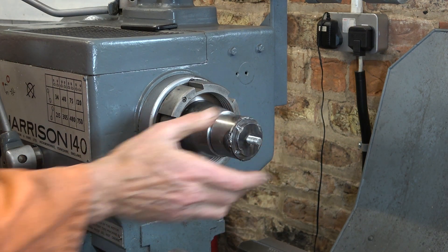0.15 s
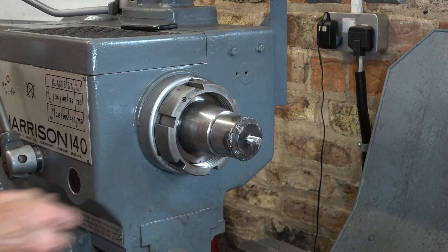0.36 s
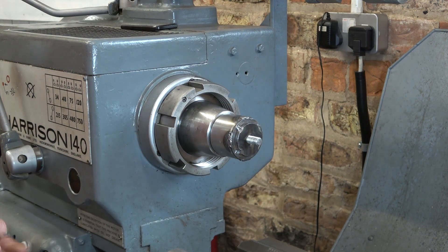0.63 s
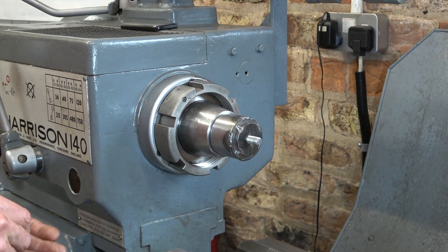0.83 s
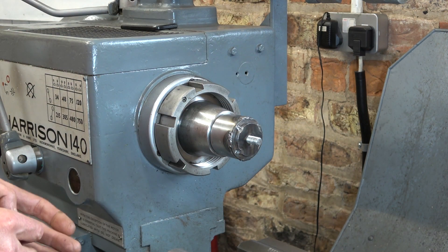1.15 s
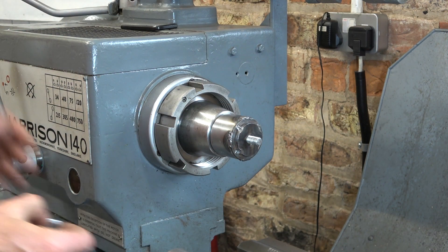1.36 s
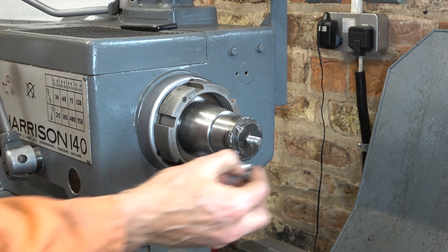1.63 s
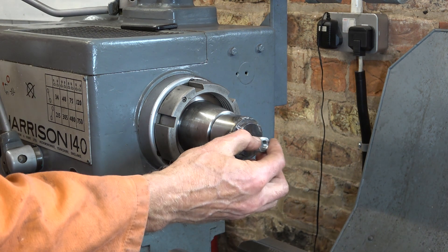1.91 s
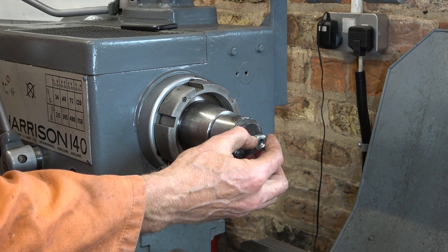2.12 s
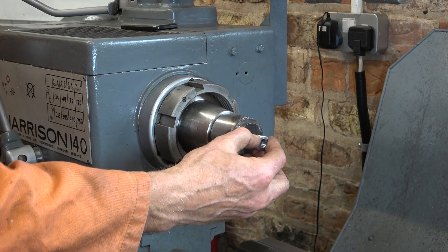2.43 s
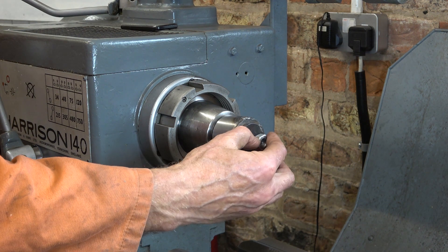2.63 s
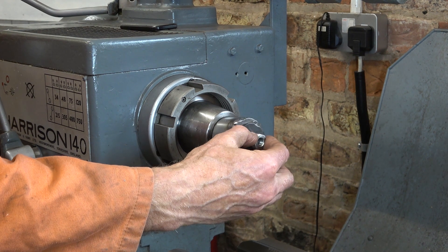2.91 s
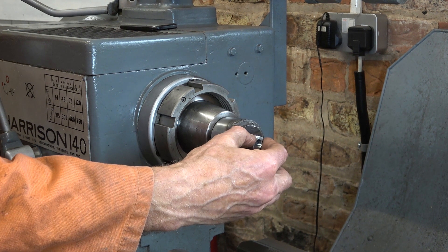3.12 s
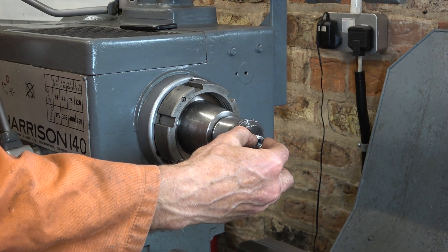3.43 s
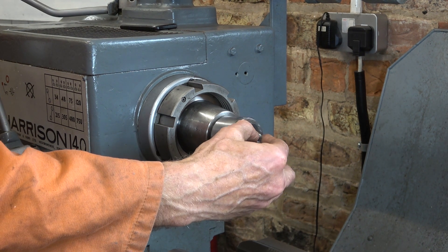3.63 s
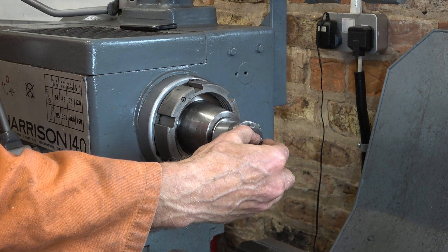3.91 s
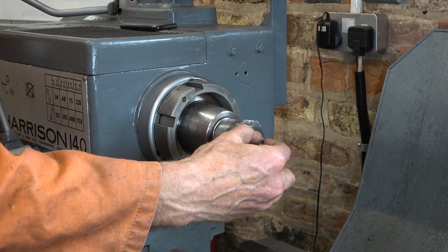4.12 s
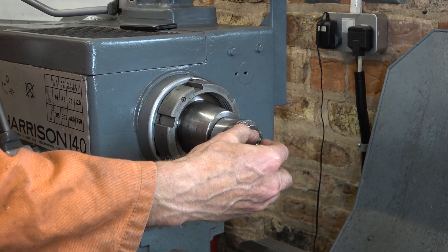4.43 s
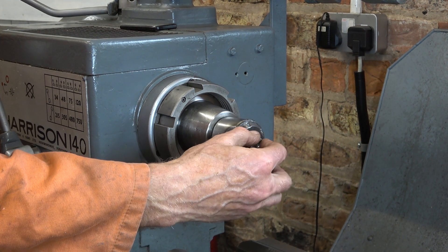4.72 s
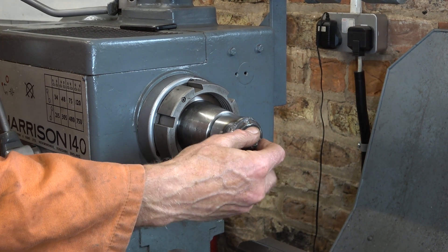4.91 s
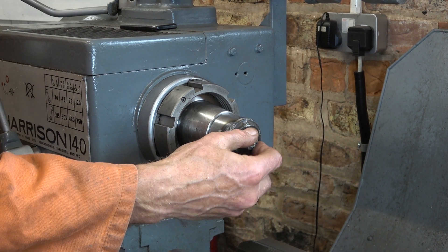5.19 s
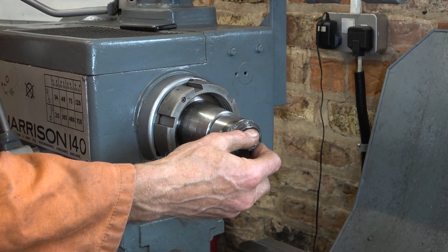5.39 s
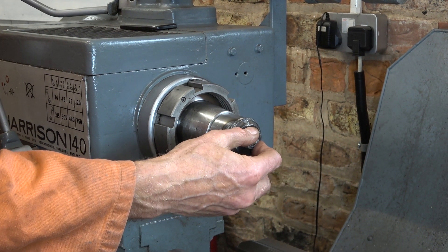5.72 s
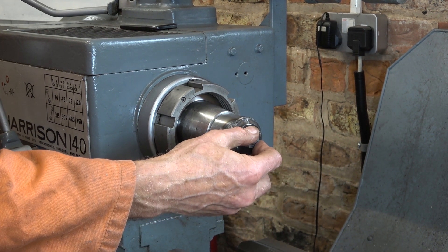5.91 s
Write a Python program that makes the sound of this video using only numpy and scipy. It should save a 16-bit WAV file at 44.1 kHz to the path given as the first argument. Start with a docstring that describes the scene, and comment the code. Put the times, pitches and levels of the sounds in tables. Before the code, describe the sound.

After faint metal ticks and sleeve rustle, metal touches metal, then hand-turned threads clack, rasp and squeak in quick uneven twists, ringing slightly.

```python
"""A threaded steel piece, fitted by hand to a lathe spindle, clacks, scrapes and squeals at each twist.
Clacks are impulse swarms exciting steel resonances; scraping is stick-slip noise, low groan and rasp.
Squeals are wavering sines on two modes; a first touch and the thread entry add ringing modes.
Around it lie ticks of metal in the fingers, dull knocks of the hand, a rustling sleeve and room air.
Decaying noise supplies the ring of machine and room in a small brick workshop."""
import sys
import numpy as np
from scipy import signal
from scipy.fft import rfft, irfft
from scipy.io import wavfile
from scipy.ndimage import map_coordinates

SR = 44100
rng = np.random.default_rng(int(sys.argv[2]) if len(sys.argv) > 2 else 0)


def master_out(mix):
    """Clip the mix to full scale and print it as 16-bit PCM to the path in sys.argv[1]."""
    frames = np.transpose(np.atleast_2d(mix))
    ceiling = np.clip(frames, -1, 1)
    pcm = np.round(ceiling * 32767).astype(np.int16)
    wavfile.write(sys.argv[1], SR, pcm)


N = 266937
T = np.arange(N) / SR
FREQ = np.maximum(np.arange(N + 1) * SR / (2 * N), 1)

# resonances and dips of the steel piece and spindle: centre_hz, width_hz, lift_db
STEEL_MODES = [(92, 27, 11.5), (297, 35, 8.5), (644.5, 8, 4), (748.5, 57, 6), (798, 37.6, 7), (853, 56, -9),
               (1203, 110, 4), (1506, 29, 3.5), (1529, 39, 6), (2032, 144, 5), (2434, 240, 3.5),
               (2945, 61, 5), (3100, 120, 5), (3587, 120, 8.5), (4160, 13, -2), (4345, 36, -13),
               (4960, 39, 6.5), (6000, 20, -6.5), (6240, 54, 11), (6750, 32, 12.5), (10630, 98, 5.5),
               (12260, 250, 5.5)]
# knocks of the piece on the spindle without turning: start_s, force_db, tick_db (relative levels)
KNOCK_EVENTS = [(1.962, -54.5, -42), (2.392, -57, -68), (2.596, -41, -44.5), (4.252, -36, -48),
                (5.472, -43, -35.5), (5.703, -30.5, -60)]
# twists of the hand, clack then rasp; weight is how hard the hand leans on the spindle:
# clack_s, length_s, force_db, weight_db, tick_db (relative levels)
TWIST_EVENTS = [(3.411, 0.063, -24.5, 0.5, -35.5), (3.684, 0.051, -25.5, 2, -37.5),
                (3.817, 0.073, -37.5, -0.5, -60), (4.270, 0.066, -20.5, -5.5, -28),
                (4.536, 0.071, -32.5, 4.5, -44), (4.696, 0.052, -32, 8.5, -35.5),
                (4.779, 0.046, -40, 10, -40), (4.945, 0.089, -34, 4, -57), (5.058, 0.077, -31.5, 2.5, -50),
                (5.237, .056, -24, 2.5, -29.5), (5.312, 0.071, -26.5, 1.5, -29.5),
                (5.492, .058, -25.5, 1, -33.5), (5.726, 0.055, -21, 0.5, -27),
                (5.787, 0.031, -21.5, -0.5, -31.5), (5.944, .09, -33.5, 1, -33)]
SQUEAL_HIGH_HZ, SQUEAL_LOW_HZ = 6342, 5074  # the two modes that friction can keep singing


def undb(db):
    """Logarithmic level: decibels become an amplitude gain."""
    return 10 ** (np.asarray(db) / 20)


def unit(x):
    """Power normalisation: scale to rms 1."""
    return x / np.sqrt(np.mean(x ** 2))


def at_hz(points, hz=FREQ):
    """Logarithmic interpolation: read a table linearly along log frequency."""
    f, value = np.transpose(points)
    return np.interp(np.log(hz), np.log(f), value)


def colour(x, points, modes=()):
    """Minimum-phase filtering: a causal filter of unit power, a smooth spectrum bearing resonances."""
    db = at_hz(points)
    for hz, width, lift in modes:
        db = db + lift / (1 + (2 * (FREQ - hz) / width) ** 2)
    # folding the cepstrum onto positive times makes the response causal
    cepstrum = irfft(np.log(unit(undb(db))))
    cepstrum[1:N] *= 2
    cepstrum[N + 1:] = 0
    response = irfft(np.exp(rfft(cepstrum)))[:SR // 4]
    return signal.fftconvolve(x, response)[:N]


def walk(rate):
    """Random modulation: smooth wandering through rate random points a second, spread near 1."""
    steps = rng.standard_normal(4096)
    return map_coordinates(steps, [T * rate], order=3, mode="wrap")


def tail(build_s):
    """Reverberation: dense noise of unit energy builds up briefly and decays at a rate set by pitch."""
    # ring time of machine and room: frequency_hz, t60_s
    decay_times = [(100, 1), (700, 0.8), (3000, 0.83), (6500, 0.81), (10000, 0.31), (16000, 0.68)]
    t = T[:SR]
    noise = rfft(rng.standard_normal(SR))
    hz = np.maximum(np.arange(SR // 2 + 1), 1)
    centres = np.log(np.geomspace(100, 16000, 9))
    out = 0
    for centre, pick in zip(centres, np.eye(len(centres))):
        band = irfft(noise * np.interp(np.log(hz), centres, pick), SR)
        t60 = at_hz(decay_times, np.exp(centre))
        out = out + band * np.exp(-np.log(1000) * t / t60)
    out = out * (1 - np.exp(-t / build_s))
    return out / np.linalg.norm(out)


def resonate(x, hz, q):
    """Resonance: a single peak with gain 1 at its centre."""
    return signal.lfilter(*signal.iirpeak(hz, q, fs=SR), x + 1e-18)


def add(track, s, sound):
    """Superposition: mix a sound in at time s."""
    i = int(s * SR)
    track[i:i + len(sound)] += sound[:N - i]


def held(s, length, rise_s, fall_s):
    """Exponential envelope: swells from time s, holds for a length and then dies away."""
    age = np.maximum(T - s, 0)
    return (1 - np.exp(-age / rise_s)) * np.exp(-np.maximum(age - length, 0) / fall_s)


def slips(rate, scatter_db):
    """Stick-slip: tiny releases at random moments, rate a second on average and of uneven size."""
    size = undb(scatter_db * np.clip(rng.standard_normal(N), -2, 2))
    size = size * rng.choice([-1, 1], N)
    return unit((rng.random(N) < rate / SR) * size)


def arm_motion():
    """Power addition: Gaussian swells of the reaches add to a steady faint rustle."""
    # reaches of the arm: middle_s, half_length_s, level_db (relative)
    reach_events = [(.28, 0.15, -60.5), (0.683, 0.14, -55), (1.457, .1, -57.5), (1.67, 0.12, -58),
                    (2.148, 0.12, -59.5)]
    rest_gain = undb(-67.5)  # the arm is never quite still
    reaches = [undb(db) * np.exp(-.5 * ((T - s) / half) ** 2) for s, half, db in reach_events]
    return np.sqrt(rest_gain ** 2 + np.sum(np.square(reaches), axis=0))


def workshop(sleeve_db):
    """Shaped noise: steady room air with a faint drone, and random slips of cloth in the sleeve."""
    # spectrum of the room air: frequency_hz, relative_db_per_hz
    air_spectrum = [(15, -28), (25, 3), (190, -5), (301, -12), (489, -11.5), (659, -10.5), (818, -9),
                    (887, -6.5), (1650, -22.5), (2000, -22), (2280, -25), (16000, -33)]
    # spectrum of the sleeve: frequency_hz, relative_db_per_hz
    cloth_spectrum = [(100, -16), (600, 7), (1200, 4.5), (2500, -0.5), (6000, -6.5), (9000, -11),
                      (13000, -17), (16000, -47)]
    drone = (307.4, 61, 13.8)  # centre Hz, width Hz, lift dB
    air = undb(-57) * colour(rng.standard_normal(N), air_spectrum, [drone])
    folds = slips(rate=6000, scatter_db=4) * undb(.8 * walk(30))
    cloth = colour(folds, cloth_spectrum) * arm_motion() * undb(sleeve_db)
    return air + cloth


def thumps(length_s):
    """Damped oscillation: soft knocks of a few low cycles that swell, peak at length_s and die."""
    # dull knocks of the hand on the machine: start_s, level_db, pitch_hz
    thump_events = [(.76, -47.5, 343), (.765, -49, 217), (5.972, -38, 155)]
    out, t = np.zeros(N), T[:SR // 2]
    swell = t / length_s * np.exp(1 - t / length_s)
    for s, db, hz in thump_events:
        add(out, s, undb(db) * swell * np.sin(2 * np.pi * hz * t))
    return out


def clink(db, ring_s, first_db, entry_db):
    """Free vibration: the loose piece rings at its first touch, and again as it enters the thread."""
    # spectrum of the diffuse ring at the first touch: frequency_hz, relative_db_per_hz
    clink_spectrum = [(3000, -21), (5100, 2), (7700, -1), (9200, -25), (10650, -5), (11300, -14),
                      (11950, -1), (13500, -31)]
    # modes of the piece while still loose: frequency_hz, relative_db, t60_s
    loose_modes = [(2105, -8, 1.0), (2970, -15, 1.4), (3490, -2.5, 1.2), (5070, -1.5, 0.53),
                   (5800, -6, 0.5), (6347, -2, .3), (7000, 1, .25), (10590, -7.5, 0.51), (11850, -6, .4)]
    out, t = np.zeros(N), T[:SR]
    first_s, entry_s = KNOCK_EVENTS[0][0], KNOCK_EVENTS[2][0]
    add(out, first_s, tail(build_s=.004) * np.exp(-t / ring_s))
    out = undb(db) * colour(out, clink_spectrum)
    modes = np.zeros(len(t))
    for hz, mode_db, t60 in loose_modes:
        modes += undb(mode_db - 60 * t / t60) * np.sin(2 * np.pi * hz * t)
    add(out, first_s, undb(first_db) * modes)
    add(out, entry_s, undb(entry_db) * modes)
    return out


def squeals(db, waver_hz, ring_s, room_db):
    """Friction-driven modes: nearly pure, wavering tones ring on when the friction lets go."""
    # squeals of the threads: start_s, length_s, level_db (relative), mode_hz (before wavering)
    squeal_events = [(2.693, 0.2, -56, SQUEAL_HIGH_HZ), (3.112, 0.11, -59, SQUEAL_LOW_HZ),
                     (3.41, 0.073, -19, SQUEAL_HIGH_HZ), (3.504, 0.021, -21, SQUEAL_HIGH_HZ),
                     (3.517, 0.049, -36.5, SQUEAL_LOW_HZ), (3.608, 0.094, -39.5, SQUEAL_HIGH_HZ),
                     (4.298, 0.13, -32.5, SQUEAL_HIGH_HZ), (4.343, 0.074, -26, SQUEAL_LOW_HZ),
                     (4.725, 0.11, -34.5, SQUEAL_HIGH_HZ), (5.005, 0.011, -46, SQUEAL_HIGH_HZ),
                     (5.392, 0.044, -35, SQUEAL_LOW_HZ)]
    drift = 2 * np.pi * np.cumsum(waver_hz * walk(70)) / SR
    tone = np.zeros(N)
    for s, length, level_db, hz in squeal_events:
        envelope = held(s, length, rise_s=0.0015, fall_s=ring_s)
        tone += undb(level_db) * envelope * np.sin(2 * np.pi * hz * T + drift)
    tone *= np.sqrt(2) * undb(db + 2 * walk(50))
    return tone + undb(room_db) * signal.fftconvolve(tone, tail(build_s=0.0035))[:N]


def strokes():
    """Frictional loading: force sets the grit; weight and engaged thread lower the groan's pitch."""
    # slides between twists, without a clack: start_s, length_s, force_db, weight_db (relative levels)
    slide_events = [(2.65, 0.078, -43.5, 6), (2.726, 0.044, -54, 19), (2.882, 0.2, -49, 5.5),
                    (3.076, 0.039, -46.5, 10.5), (3.285, 0.095, -37.5, -1), (3.548, 0.1, -35, 4),
                    (3.894, 0.083, -38.5, 8), (4.128, 0.12, -43.5, 12), (4.408, 0.066, -29, 6.5),
                    (5.889, 0.051, -28, -3.5)]
    lead_s = 0.0078  # the threads start to rub just before they clack
    twist_swell, slide_swell = 0.12, 0.25  # rise time of the pressure as a share of the stroke
    # the pitch sinks as more turns of thread take hold, and under the weight of the hand
    engage_s, seating_s = 2.57, 0.89
    loose_hz, seated_hz = 1270, 690  # pitch at engagement and its final limit, before the sag
    sag_per_db = .013  # fall in log pitch per dB of weight
    pushes = [(s - lead_s, length, force_db, weight_db, twist_swell)
              for s, length, force_db, weight_db, _ in TWIST_EVENTS]
    pushes += [(*row, slide_swell) for row in slide_events]
    rows = []  # start_s, length_s, rise_s, groan_db, pitch_hz, grit_db
    for s, length, force_db, weight_db, swell in pushes:
        hz = seated_hz + (loose_hz - seated_hz) * np.exp((engage_s - s) / seating_s)
        hz = hz * np.exp(-sag_per_db * weight_db)
        rows.append((s, length, swell * length, force_db + weight_db, hz, force_db))
    return rows


def dry_and_room(dry, room_db):
    """Convolution: the rubbing joins its ring in the machine and room."""
    return dry + undb(room_db) * signal.fftconvolve(dry, tail(build_s=0.013))[:N]


def rubbing(groan_db, grit_db, room_db, grip_db, grip_q, firmness, flank_db, flank_q):
    """Stick-slip friction: coarse slips make the spindle groan; fine ones rasp on the thread flanks."""
    # spectrum of the groan: frequency_hz, relative_db_per_hz
    groan_spectrum = [(25, -27), (85, -11), (160, -9), (320, 0), (750, -1.5), (950, -3), (1300, -2.5),
                      (2000, -18), (5000, -16), (16000, -61)]
    # spectrum of the rasp: frequency_hz, relative_db_per_hz
    grit_spectrum = [(200, -25), (900, -16), (1700, 6), (3300, -3), (4600, -7.5), (6800, -7.5), (8200, -13),
                     (11000, -36), (16000, -57)]
    firm_groan_db = -20  # groan of a firm twist, before the overall groan level
    flank_low_hz, flank_high_hz = 1305, 5930  # resonances that shift with the point of contact
    coarse = slips(rate=600, scatter_db=3) * undb(1.8 * walk(40))
    fine = slips(rate=1800, scatter_db=4) * undb(1.8 * walk(45))
    groan, grit = np.zeros(N), np.zeros(N)
    for s, length, rise_s, low_db, hz, high_db in strokes():
        pressure = held(s, length, rise_s, fall_s=0.014)
        push = coarse * pressure * undb(low_db)
        # a light touch sounds mostly the contact; a firm one shakes the whole headstock
        shake = push * undb(firmness * (low_db - firm_groan_db))
        groan += shake + undb(grip_db) * resonate(push, hz, grip_q)
        rasp = fine * pressure * undb(high_db)
        # every stroke bears on another spot of the thread and brings out other resonances
        flanks = flank_low_hz * (flank_high_hz / flank_low_hz) ** rng.random(size=3)
        grit += rasp + undb(flank_db) * sum(resonate(rasp, f, flank_q) for f in flanks)
    groan = undb(groan_db) * colour(groan, groan_spectrum, STEEL_MODES)
    grit = undb(grit_db) * colour(grit, grit_spectrum, STEEL_MODES)
    return dry_and_room(groan + grit, room_db)


def chatter(length, rate, scatter_db):
    """Repeated impact: a first contact and a dense swarm of dying rebounds, of unit energy together."""
    t = T[:SR // 5]
    size = rng.choice([-1, 1], len(t)) * undb(scatter_db * rng.uniform(-1.57, 1, len(t)))
    force = (rng.random(len(t)) < rate / SR) * size
    force[0] = 1
    force *= np.exp(-(t / length) ** 2)
    return force / np.linalg.norm(force)


def contacts(rows, modes, tick_db, ring_db, tick_room_db, direct_db, point_db):
    """Impact excitation: each blow gives a bright pitched tick and rings the steel, machine and room."""
    # spectrum of the tick: frequency_hz, relative_db_per_hz
    tick_spectrum = [(30, -46), (1000, -8.5), (3000, 1.5), (7000, 10), (8500, 5), (11000, 1), (13500, -2.5),
                     (16000, -28.5)]
    # spectrum of the ring: frequency_hz, relative_db_per_hz
    ring_spectrum = [(25, -14), (100, -27.5), (200, 0.5), (350, -7), (700, 4.5), (1000, 1), (2500, 2),
                     (4500, 3), (6800, 1), (8200, -8), (11000, -21.5), (16000, -37.5)]
    tick, ring = np.zeros(N), np.zeros(N)
    for s, sharp_db, body_db, length, hz in rows:
        force = chatter(length, rate=5000, scatter_db=6)
        # the point of contact sets the pitch of the tick
        pitched = force + undb(point_db) * resonate(force, hz, q=13.0)
        add(tick, s, pitched * undb(sharp_db + tick_db) * np.sqrt(length * SR))
        add(ring, s, force * undb(body_db + ring_db))
    tick = colour(tick, tick_spectrum, modes)
    ring = colour(ring, ring_spectrum, modes)
    room = signal.fftconvolve(ring + undb(tick_room_db) * tick, tail(build_s=0.0066))[:N]
    return tick + undb(direct_db) * ring + room


def clacks():
    """Impact scaling: a blow of greater force rings louder and rebounds for longer."""
    firm_db = -22  # force of a firm twist
    firm_chatter_s, growth = 0.021, 0.41  # rebounds of a firm clack; dB of length per dB of force
    clack_hz = 10300  # pitch of the tick where thread meets thread
    blows = list(KNOCK_EVENTS)
    blows += [(s, force_db, tick_db) for s, _, force_db, _, tick_db in TWIST_EVENTS]
    rows = []  # start_s, tick_db, ring_db, chatter_s, pitch_hz
    for s, force_db, tick_db in blows:
        length = firm_chatter_s * undb(growth * (force_db - firm_db))
        rows.append((s, tick_db, force_db, length, clack_hz))
    return rows


def stereo(x, balance_db, wider_db):
    """Mid-side stereo: early reflections enter left and right with opposite sign to give width."""
    # side level against mid, before wider_db: frequency_hz, level_db
    side_width = [(60, -18.5), (600, -18), (2500, -21), (4400, -20), (8000, -6.5), (15000, -17)]
    t = T[:SR // 10]
    early = rng.standard_normal(len(t)) * t * np.exp(-t / .008)
    side = signal.fftconvolve(x, early / np.linalg.norm(early))[:N]
    side = rfft(side, 2 * N) * undb(at_hz(side_width) + wider_db)
    sign = np.array([[1], [-1]])  # left, right
    return irfft(rfft(x, 2 * N) * undb(sign * balance_db / 2) + sign * side)[:, :N]


def scene():
    """Superposition of sources: sounds at the spindle, with touches and the diffuse workshop around."""
    # light touches of metal in the fingers: start_s, tick_db (relative), pitch_hz
    tick_events = [(.338, -45.5, 11900), (0.528, -37, 10100), (.551, -39, 12500), (1.344, -43.5, 11800),
                   (3.225, -50, 12400), (4.104, -47, 12860), (5.202, -39, 9800)]
    # left minus right at the spindle: frequency_hz, level_db
    spindle_balance = [(100, 3), (200, 4), (380, -2), (700, -3), (1200, 0.6), (8000, -0.4)]
    touch_ring_db, touch_s = -15, 0.0021  # ring against tick, before their gains; contact length
    touch_rows = [(s, db, db + touch_ring_db, touch_s, hz) for s, db, hz in tick_events]
    touches = contacts(touch_rows, (), tick_db=-6.0, ring_db=30.5, tick_room_db=1.5,
                       direct_db=-4.0, point_db=7)
    around = touches + thumps(length_s=0.009) + workshop(sleeve_db=0.5)
    loose = clink(db=-12.5, ring_s=0.94, first_db=-55, entry_db=-50.5)
    singing = squeals(db=-3.0, waver_hz=14.0, ring_s=0.014, room_db=-6.0)
    rub = rubbing(groan_db=-7.5, grit_db=-6.5, room_db=-2.0, grip_db=4.5, grip_q=2.28,
                  firmness=0.29, flank_db=2, flank_q=33)
    knocks = contacts(clacks(), STEEL_MODES, tick_db=1.5, ring_db=33.5, tick_room_db=-5.5,
                      direct_db=-8.5, point_db=-5.5)
    spindle = loose + knocks + rub + singing
    placed_spindle = stereo(spindle, at_hz(spindle_balance), wider_db=1.0)
    return placed_spindle + stereo(around, balance_db=1.4, wider_db=5.5)


def record(dry):
    """Band limiting: a high-pass drops the deepest rumble and a steep low-pass cuts the top."""
    low_hz, top_hz = 34, 16200
    thinned = signal.sosfilt(signal.butter(4, low_hz, "high", fs=SR, output="sos"), dry)
    return signal.sosfilt(signal.ellip(10, .2, 80, top_hz, fs=SR, output="sos"), thinned)


dry = scene()
out = record(dry)
master_out(out)
```